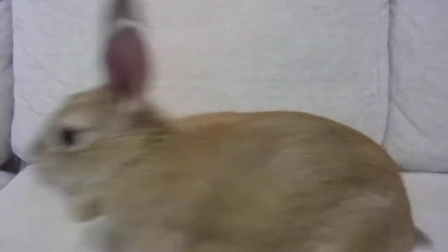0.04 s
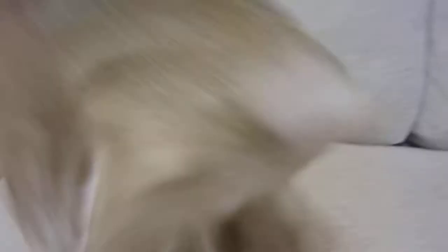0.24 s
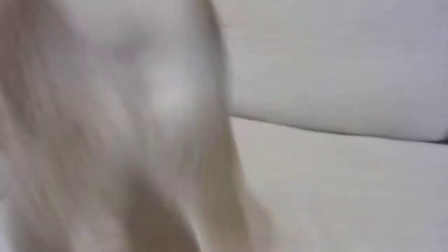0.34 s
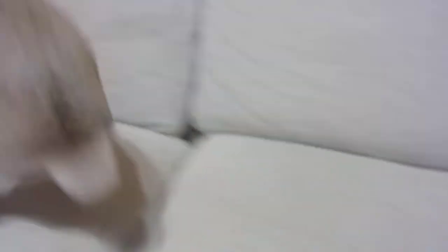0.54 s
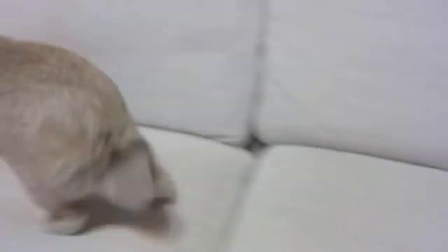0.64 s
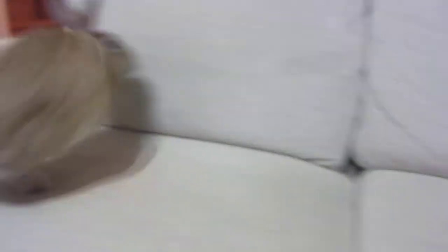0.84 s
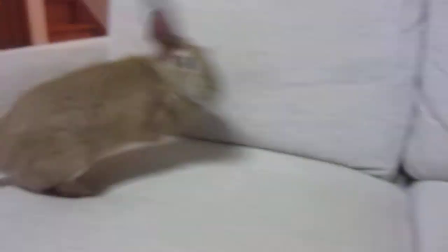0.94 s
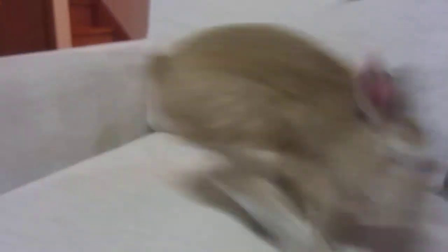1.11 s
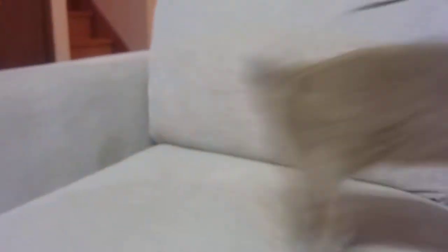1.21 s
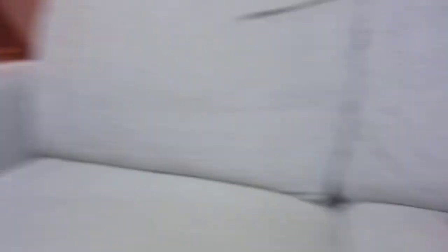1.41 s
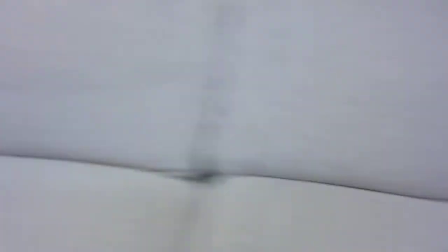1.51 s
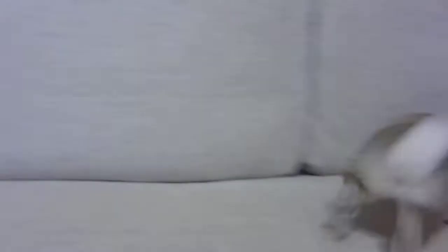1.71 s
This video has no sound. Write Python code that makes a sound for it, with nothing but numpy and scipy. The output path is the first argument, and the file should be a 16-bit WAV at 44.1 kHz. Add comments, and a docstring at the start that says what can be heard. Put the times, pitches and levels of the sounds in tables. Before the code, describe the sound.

A rabbit hops on a fabric sofa, close to the microphone. Light scuffs lead to a loud cluster of dull thuds and claw ticks at 0.3 seconds, then soft steps and a second cluster at 0.9. Lighter thumps follow near 1.2 and from 1.5 to 1.7. One sharp click sounds on the right at 1.35. Air buffets the microphone softly near the end, over faint hiss and low hum.

```python
"""Rabbit on a sofa

A rabbit hops to and fro in a quiet room, close to a hand-held microphone. Its paws scuff the fabric,
thud into the cushions and tick with their claws; air buffets the swinging microphone.
One sharp click on the right makes the limiter duck the faint hiss and mains hum."""
import sys
import numpy as np
from scipy import signal
from scipy.fft import rfft, irfft, next_fast_len
from scipy.io import wavfile
from scipy.ndimage import uniform_filter1d, map_coordinates

SR = 44100
rng = np.random.default_rng(int(sys.argv[2]) if len(sys.argv) > 2 else 0)


def unload_wav(signal):
    """Save mono or channel-first audio to the path in sys.argv[1] as 16-bit WAV at rate SR, clipped to [-1, 1]."""
    wavfile.write(
        sys.argv[1],
        SR,
        np.round(np.clip(np.atleast_2d(signal).T, -1, 1) * 32767).astype(np.int16),
    )


N = 77175
T = np.arange(N) / SR
TOUCH_T = np.arange(-SR // 10, SR // 6) / SR  # t/s around one touch


def scuffs(fur_db=-23, fur_stretch=2.4):
    """Each paw stroke is a swell of slips with its own brightness, inside an airy swish of fur."""
    # peak t/s, rise/s, fall/s, level/dB before fabric colour, low edge/Hz, high edge/Hz
    strokes = [(.122, 0.0068, 0.011, -34, 595, 3380), (.181, 0.0046, .011, -34, 200, 2860),
               (.236, 0.011, 0.016, -28.5, 280, 1600), (.256, 0.0036, .026, -20, 330, 1550),
               (.283, 0.0099, .016, -16.5, 530, 1900), (.35, 0.025, 0.025, -41, 120, 2820),
               (0.3893, .0025, .0058, -33, 1010, 1900), (.415, .018, .011, -38.5, 120, 420),
               (.557, 0.0068, 0.0096, -37, 216, 776), (.6, .002, .013, -41, 550, 1000),
               (.713, 0.0072, 0.013, -38.5, 160, 950), (.724, .014, 0.016, -48, 2600, 5960),
               (.872, .007, 0.0083, -19, 560, 950), (.888, 0.0043, .013, -19.5, 380, 900),
               (.9145, .005, .0045, -19, 480, 1100), (.935, .005, .012, -28.5, 400, 720),
               (.997, 0.019, 0.027, -33, 198, 1800), (1.024, 0.0046, .009, -22, 340, 1650),
               (1.087, .009, .011, -34.5, 300, 3100), (1.160, 0.0083, 0.02, -40, 130, 1800),
               (1.253, 0.0049, 0.0056, -39, 200, 1700), (1.539, .003, 0.0064, -36.5, 250, 1390),
               (1.564, 0.0032, 0.0098, -37, 198, 790), (1.664, .012, 0.01, -35.5, 326, 565)]
    fabric_colour = [(250, 9.5), (850, 2.5), (1500, -1.5), (2200, -3), (3200, -1), (5000, -3), (9000, -4)]  # f/Hz, gain/dB
    fabric_width = [(400, -26), (1500, -12.5), (10000, 0.5)]  # f/Hz, side gain/dB
    fur_colour = [(2000, -11), (5000, 4.5), (14000, 1)]  # f/Hz, gain/dB
    rubbing, fur_power = np.zeros((2, N)), np.zeros(N)
    for s, rise, fall, db, low_hz, high_hz in strokes:
        envelope = swell(TOUCH_T, rise, fall)
        stroke = cloth_band(slips() * envelope, low_hz, high_hz)
        stroke *= np.sqrt(np.sum(envelope ** 2) / np.sum(stroke ** 2, axis=1, keepdims=True))
        add(rubbing, from_db(db) * stroke, s)
        airiness = (high_hz / 2000) ** .95
        add(fur_power, (from_db(db + fur_db) * airiness * envelope ** (1 / fur_stretch)) ** 2, s)
    mid, side = colour(rubbing, fabric_colour)
    fur = np.sqrt(fur_power) * colour(rng.standard_normal((2, N)), fur_colour)
    return stereo(mid, colour(side, fabric_width)) + fur


def slips(rate_per_s=5000, spread_db=4.5):
    """Threads slip under a paw: dense uneven clicks, levelled over 7 ms; mid and side."""
    shape = (2, len(TOUCH_T))
    sizes = from_db(spread_db * np.minimum(rng.exponential(1, shape), 4))
    signs = rng.choice([-1, 1], shape)
    clicks = sizes * signs * (rng.random(shape) < rate_per_s / SR)
    return clicks / np.sqrt(uniform_filter1d(clicks ** 2, size=300) + 1e-6)


def cloth_band(x, low_hz, high_hz, muffle_ratio=3.9):
    """Cloth passes one band and swallows the treble more steeply far above it."""
    band = cut(cut(x, low_hz, "high"), high_hz, "low")
    return cut(band, high_hz * muffle_ratio, "low")


def thuds():
    """Feet land in a heavily damped cushion."""
    landings = [(0.3015, -8.5, 332), (0.3125, -12.5, 306), (.3292, -14.5, 288), (.386, -28, 197),
                (0.5505, -28, 402), (.563, -27, 252), (0.7503, -30.5, 190), (.8747, -11.5, 600),
                (.8902, -14, 500), (.9147, -11, 474), (.9203, -13, 600), (1.084, -33, 127),
                (1.1516, -27, 259), (1.1601, -20.5, 380), (1.1639, -23.5, 116), (1.2497, -25.5, 140),
                (1.487, -24, 234), (1.640, -27, 215), (1.657, -20.5, 550)]  # t/s, peak/dB, f/Hz
    return sum(from_db(db) * push(s, hz) for s, db, hz in landings)


def push(s, hz, swell_cycles=.48, ring_cycles=.9):
    """A soft surface gives way, deepest at time s, and swings back for a cycle or two."""
    cycles = (T - s) * hz
    width = np.where(cycles < 0, swell_cycles, ring_cycles)
    return -np.cos(2 * np.pi * cycles) * np.exp(-np.minimum((cycles / width) ** 2, 40))


def claws(fall_s=.001):
    """A snagged thread lets go: one spike and brief grit, strongest just under a steep high edge."""
    snags = [(.2818, -15, 4500), (.311, -23, 5000), (.3277, -19, 5000), (.39, -22, 2400), (.702, -31, 1600),
             (.871, -19, 3100), (.879, -15, 3400), (.8885, -18, 3200), (.9207, -15, 2200),
             (1.09, -18, 3400), (1.159, -26, 2600), (1.252, -32, 2400), (1.562, -27.5, 1100)]  # t/s, peak/dB, high edge/Hz
    ticks = np.zeros(N)
    for s, db, high_hz in snags:
        grit = .25 * rng.standard_normal(len(TOUCH_T)) * swell(TOUCH_T, fall_s / 10, fall_s)
        crack = cut(grit + (TOUCH_T == 0), .4 * high_hz, "high", order=1)
        crack = cut(crack, high_hz, "low", order=6)
        add(ticks, from_db(db) * crack / np.abs(crack).max(), s)
    return ticks


def click(at_s=1.3464, t60_cycles=27, left_db=-16, scatter_db=-21.5, scatter_s=.0015):
    """Quickly dying modes, mostly on the right, and a short scatter from nearby surfaces."""
    modes = [(1380, -22.5), (2200, -30), (2750, -21.5), (3780, -17), (4820, -13), (5400, -17), (6850, -8.5),
             (8400, -3.5)]  # f/Hz, level/dB before the high-pass
    age = np.maximum(T - at_s, 0)
    ring = sum(from_db(db - 60 * age * hz / t60_cycles) * np.sin(2 * np.pi * hz * age)
               for hz, db in modes)
    panned = np.array([from_db(left_db) * ring, ring])
    scatter = rng.standard_normal((2, N)) * swell(T - at_s, scatter_s / 20, scatter_s)
    return cut(panned + from_db(scatter_db) * scatter, hz=1800, kind="high")


def buffeting(side_db=-11):
    """Air rumbles and puffs on the ports as the microphone swings after the rabbit."""
    rumble_spectrum = [(20, -8), (110, -7), (250, -20), (800, -43)]  # f/Hz, relative density/dB
    rumble_level = [(0, -67), (.2, -52.5), (.95, -53), (1.14, -44.5), (1.42, -51.5), (1.56, -42),
                    (1.75, -45.5)]  # t/s, level/dB
    air_puffs = [(.195, -36, 27.8, 0), (1.5503, -35, 75, -18), (1.5564, -29.5, 81, 11), (1.592, -36, 90, 3),
                 (1.7367, -32, 96, -18.5)]  # t/s, peak/dB, f/Hz, left minus right/dB
    mid, side = colour(rng.standard_normal((2, N)), rumble_spectrum)
    rumble = level(rumble_level) * unit_rms(stereo(mid, from_db(side_db) * side))
    puffs = sum(from_db([[db + pan / 2], [db - pan / 2]]) * push(s, hz) for s, db, hz, pan in air_puffs)
    return rumble + puffs


def room(x, gain_db=-14.5, t60_s=.41, high_hz=2000, side_db=-19, delay_s=.008):
    """Reflections of a living room: a short, dull tail."""
    tail = cut(rng.standard_normal((2, N)), high_hz, "low") * from_db(-60 * T / t60_s) * (T > delay_s)
    tail /= np.sqrt(np.sum(tail ** 2, axis=1, keepdims=True) * SR / 2 / high_hz)  # passband near 0 dB
    mid, side = signal.fftconvolve(x[None], tail, axes=1)[:, :N]
    return from_db(gain_db) * stereo(mid, from_db(side_db) * side)


def hiss():
    """Faint noise of drifting level, wider in the treble."""
    hiss_spectrum = [(25, -8), (140, 2), (600, -5), (2300, -10), (4500, -14.5), (8000, -21), (16000, -38)]  # f/Hz, relative density/dB
    hiss_level = [(0, -50.5), (.15, -43.5), (.6, -49.5), (1.25, -45), (1.75, -45.5)]  # t/s, level/dB
    hiss_width = [(60, -12.5), (1000, -3), (12000, 1.5)]  # f/Hz, side gain/dB
    mid, side = colour(rng.standard_normal((2, N)), hiss_spectrum)
    return level(hiss_level) * unit_rms(stereo(mid, colour(side, hiss_width)))


def mains_hum(hz=99.3, rms_db=-51.5, waver_depth=.36):
    """One low tone whose level wavers at random."""
    waver = 1 + waver_depth * unit_rms(cut(rng.standard_normal(N), hz=7.1, kind="low"))
    return from_db(rms_db) * unit_rms(waver * np.sin(2 * np.pi * hz * T))


def from_db(db):
    """Decibels to gain."""
    return 10 ** (np.asarray(db) / 20)


def unit_rms(x):
    """Scale to rms 1."""
    return x / np.sqrt(np.mean(x ** 2) + 1e-20)


def level(rows):
    """Gain over time from rows of t/s, level/dB."""
    return from_db(np.interp(T, *np.transpose(rows)))


def colour(x, points):
    """Filter by a curve through rows of f/Hz, gain/dB."""
    hz, db = np.transpose(points)
    size = next_fast_len(2 * N)
    grid_hz = np.maximum(np.fft.rfftfreq(size, 1 / SR), 1)
    gain = from_db(np.interp(np.log(grid_hz), np.log(hz), db))
    return irfft(rfft(x, size) * gain, size)[..., :N]


def cut(x, hz, kind, order=2):
    """High- or low-pass."""
    sections = signal.butter(order, min(hz, SR / 2 - 1), kind, fs=SR, output="sos")
    return signal.sosfilt(sections, x + 1e-18)


def stereo(mid, side):
    """Left and right from mid and side."""
    return np.array([mid + side, mid - side])


def swell(t, rise_s, fall_s):
    """Exponential rise to 1 at t = 0, then exponential fall."""
    return np.exp(-np.minimum(np.maximum(-t / rise_s, t / fall_s), 40))


def add(out, sound, s):
    """Mix in one touch, its time zero at s."""
    start = int((s + TOUCH_T[0]) * SR)
    skip = max(-start, 0)
    part = out[..., start + skip:start + len(TOUCH_T)]
    part += sound[..., skip:skip + part.shape[-1]]


def scene():
    """The rabbit in the room, with the noises at the microphone."""
    right_lag_s = .00004  # the left port is nearer to the sofa
    left, right = scuffs() + thuds() + claws()
    rabbit = np.array([left, map_coordinates(right, [(T - right_lag_s) * SR], order=3)])
    return rabbit + room(left) + click() + buffeting() + hiss() + mains_hum()


def record(dry):
    """Microphone colour, a limiter that reacts late and recovers slowly, clipping, treble cut-off."""
    microphone_response = [(9200, -0.5), (10800, -10), (11400, -22.5), (12100, -8.5), (13500, -6),
                           (16000, -12)]  # f/Hz, gain/dB
    limit_db, attack_s, recover_db_per_s = -8, .0071, 43.5
    cutoff_hz = 15900
    x = colour(dry, microphone_response)
    over_db = np.maximum(20 * np.log10(np.abs(x).max(axis=0) + 1e-9) - limit_db, 0)
    held_db = np.maximum.accumulate(over_db + recover_db_per_s * T) - recover_db_per_s * T
    pole = np.exp(-1 / (attack_s * SR))
    duck_db = signal.lfilter([1 - pole], [1, -pole], held_db)
    clipped = np.clip(x * from_db(-duck_db), -1, 1)
    return signal.sosfilt(signal.ellip(10, .1, 80, cutoff_hz, fs=SR, output="sos"), clipped)


dry = scene()
out = record(dry)
unload_wav(out)
```